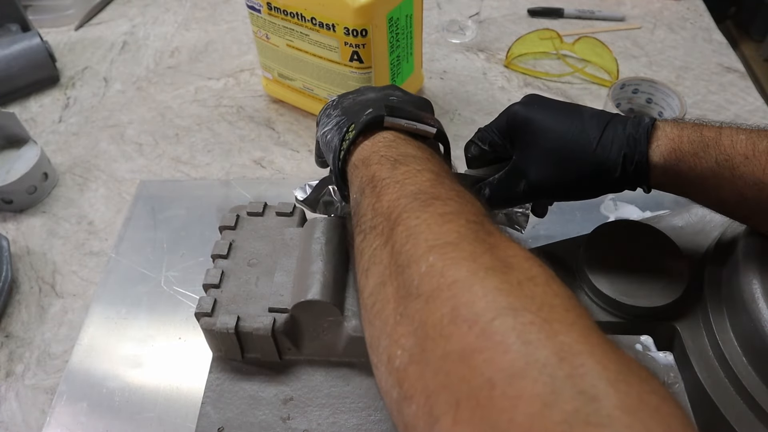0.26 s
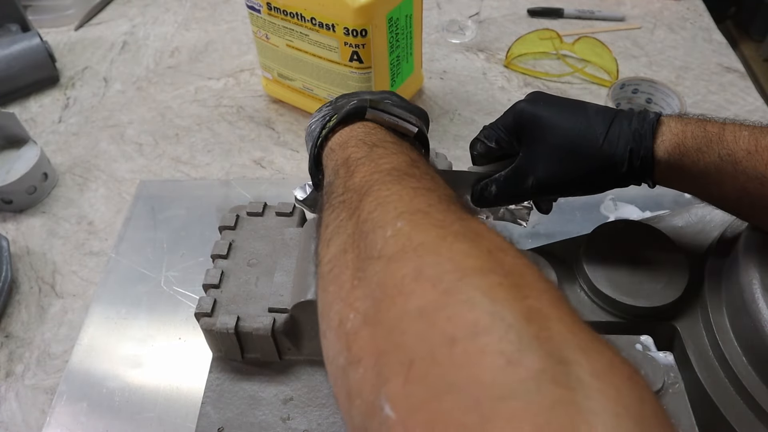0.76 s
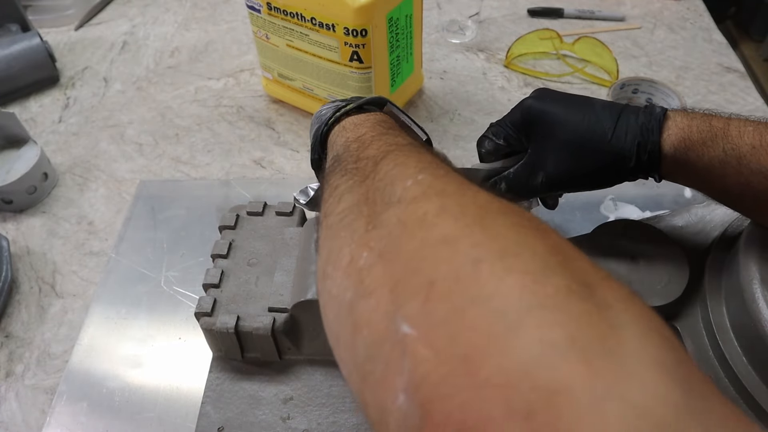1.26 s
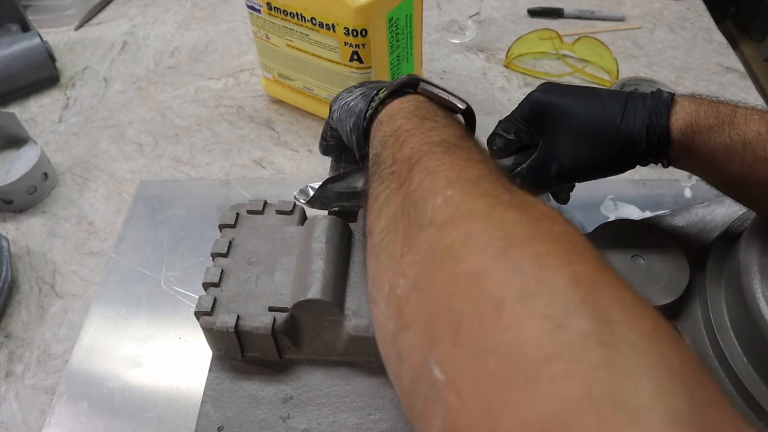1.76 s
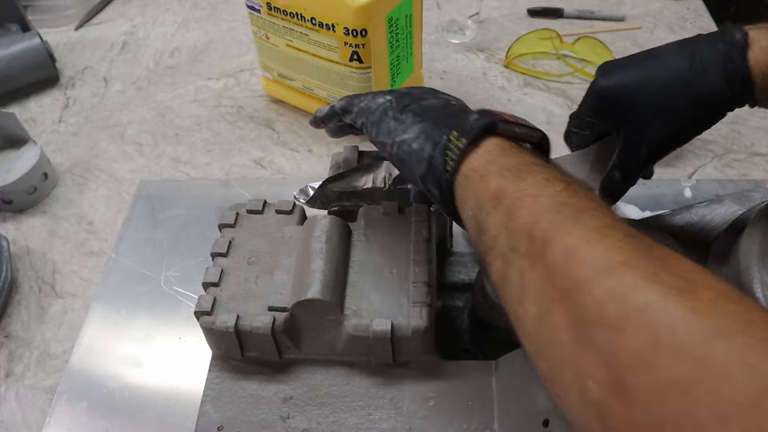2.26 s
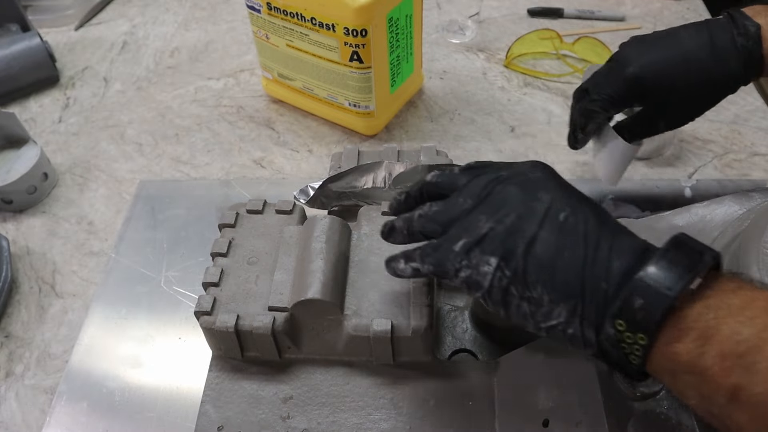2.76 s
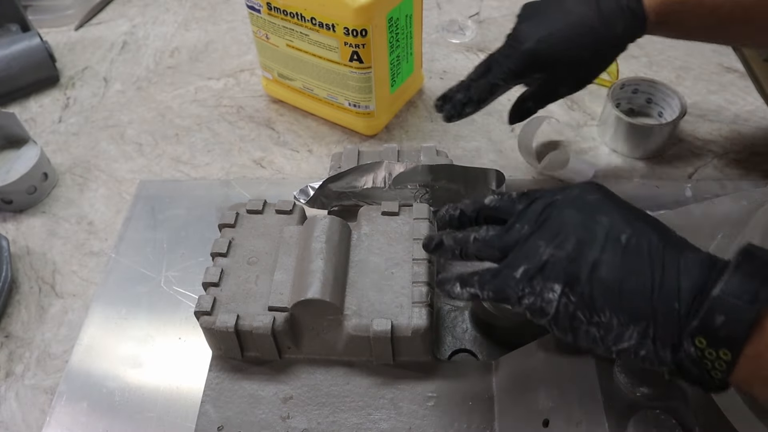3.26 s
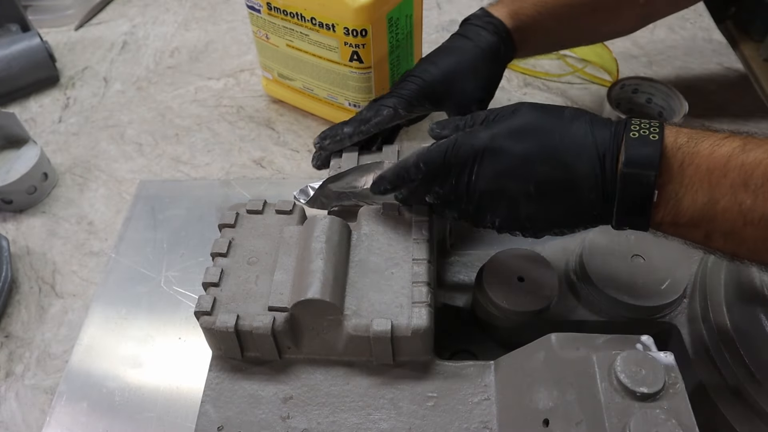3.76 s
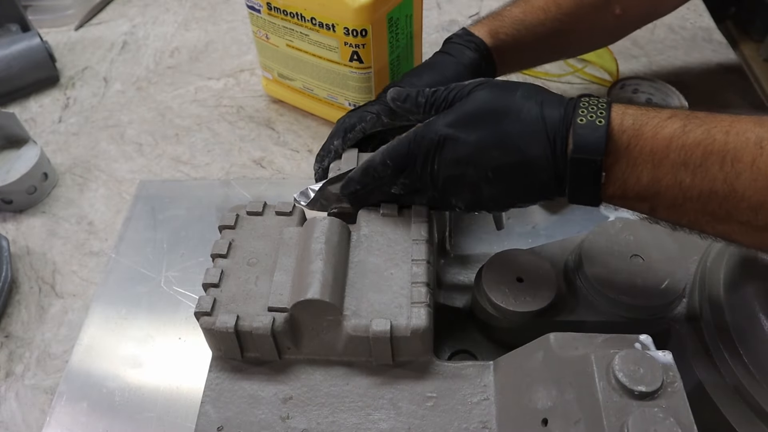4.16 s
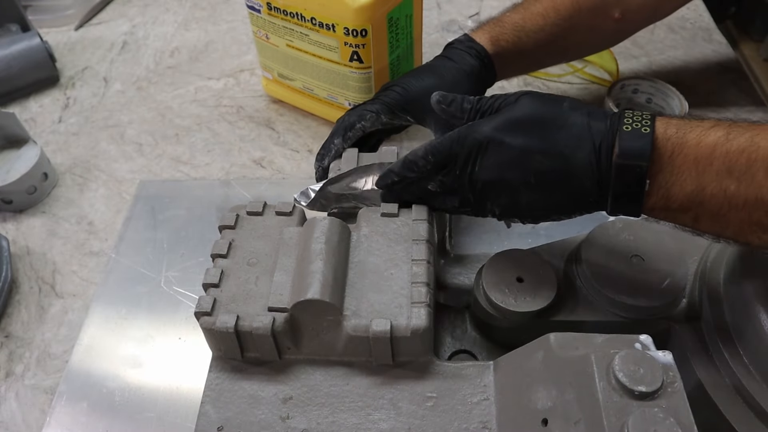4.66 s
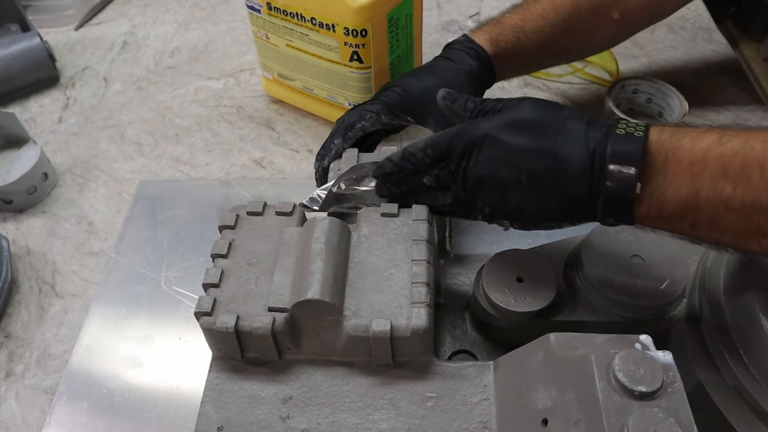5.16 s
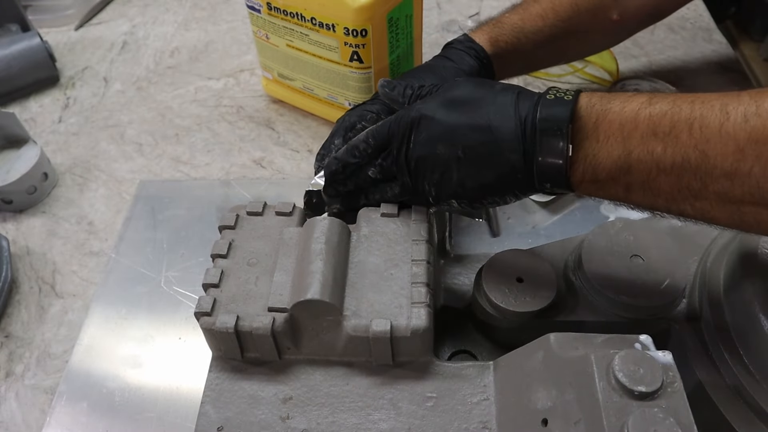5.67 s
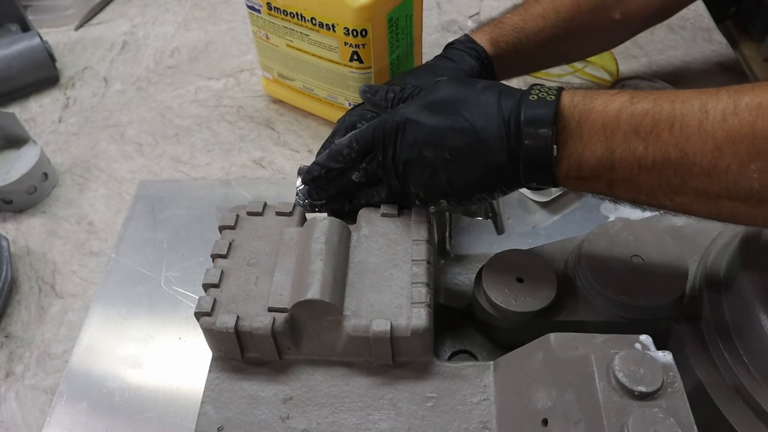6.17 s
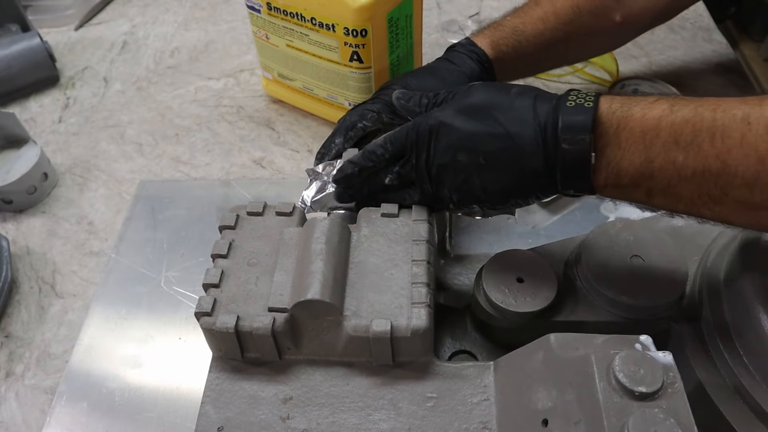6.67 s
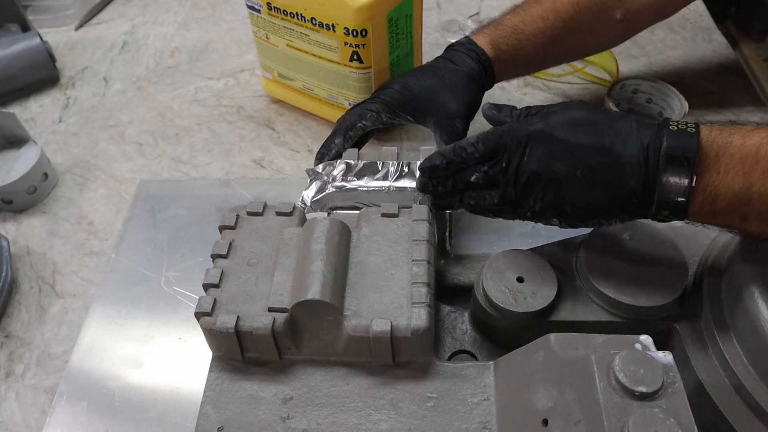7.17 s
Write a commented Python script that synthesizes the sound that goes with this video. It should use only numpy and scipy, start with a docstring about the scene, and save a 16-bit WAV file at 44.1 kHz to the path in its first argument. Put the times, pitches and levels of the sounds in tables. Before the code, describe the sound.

Close, irregular foil crackling and scraping under gloved hands, creases popping brightly while the casting beneath thuds softly on a workbench.

```python
"""Foil tape on a casting

Gloved fingers press foil tape over a hollow casting on a workbench, close to a mid-side microphone.
Strokes are streams of tiny random clicks that hiss, ring the foil and shake the casting.
Creases snap as bursts of ringing noise, loose flaps ping, and the casting groans and knocks as swelling tones.
Filtered noise makes the room hiss and the faint rumble underneath."""
import sys
import numpy as np
from scipy import signal
from scipy.fft import rfft, irfft, next_fast_len
from scipy.io import wavfile

SR = 44100
rng = np.random.default_rng(int(sys.argv[2]) if len(sys.argv) > 2 else 0)


def transcribe(u):
    """Save the signal u as a 16-bit wav file named by the first command-line argument.

    u: samples, shape (n,) or (channels, n), limited to [-1, 1]; the rate is SR.
    q: integer samples, one column per channel.
    """
    v = np.clip(np.atleast_2d(u).T, -1, 1)
    q = np.round(v * 32767).astype(np.int16)
    wavfile.write(sys.argv[1], SR, q)


def invert_db(level):
    """Linear amplitude ratio for a level in decibels (20 dB per decade), elementwise."""
    return 10 ** (np.asarray(level, dtype=float) / 20)


N = 326384  # length in samples

# Finger strokes. Each row: rough touch, hardest moment and lift in seconds (in short strokes these may
# cross slightly), then hiss, scrape and drag in dB at the hardest moment.
STROKES = [(0.0, 0.019, 0.064, -36, -35.5, -34), (0.058, 0.093, 0.14, -58.5, -55.5, -46),
           (0.172, .178, 0.19, -65, -54, -37), (0.195, 0.213, 0.27, -44, -41, -42),
           (0.237, 0.281, 0.36, -51, -47, -41), (0.388, 0.54, 0.68, -52.5, -53.5, -41.5),
           (0.707, 0.695, 0.77, -55.5, -50.5, -47.5), (0.825, 0.826, 0.86, -63.5, -60, -45.5),
           (0.876, 0.892, 0.89, -59.5, -60, -47), (0.953, 0.966, 1.45, -53.5, -53, -38.5),
           (1.304, 1.308, 1.305, -32, -41, -48), (1.348, 1.376, 1.426, -53.5, -44.5, -36),
           (1.489, 1.52, 1.622, -44, -37.5, -25.5), (1.555, 1.612, 1.7, -50, -42.5, -39),
           (1.688, 1.696, 1.78, -35.5, -43, -46), (1.79, 1.858, 1.926, -52, -57.5, -46),
           (1.928, 1.964, 2.04, -48, -54, -42.5), (2.067, 2.078, 2.176, -43.5, -45, -38.5),
           (2.188, 2.197, 2.24, -36, -30, -51), (2.247, 2.316, 2.484, -44, -52.5, -46),
           (2.427, 2.438, 2.684, -34, -34.5, -39.5), (2.463, 2.494, 2.55, -24.5, -23, -45),
           (2.56, 2.555, 2.85, -43.5, -46, -50), (2.657, 2.731, 2.753, -31, -39, -39.5),
           (2.73, 2.759, 2.827, -38.5, -40.5, -40.5), (2.842, 2.91, 2.9, -53, -63, -55),
           (2.957, 2.958, 3.06, -31.5, -37, -50), (3.008, 3.006, 3.08, -32, -29.5, -52),
           (3.067, 3.141, 3.16, -40.5, -52, -54), (3.12, 3.179, 3.184, -40, -48.5, -52.5),
           (3.296, 3.306, 3.34, -39, -45.5, -76), (3.308, 3.343, 3.407, -32, -33.5, -61.5),
           (3.512, 3.508, 3.536, -48.5, -58, -61), (3.606, 3.688, 3.72, -62.5, -87, -88),
           (3.819, 3.835, 3.985, -45.5, -54, -48.5), (3.914, 3.962, 3.94, -41.5, -49, -40),
           (4.057, 4.085, 4.18, -54, -57.5, -46), (4.202, 4.238, 4.28, -50, -56, -48),
           (4.253, 4.314, 4.37, -48.5, -52.5, -46), (4.475, 4.537, 4.574, -42.5, -47, -44.5),
           (4.601, 4.636, 4.625, -42, -47, -42), (4.827, 4.819, 4.84, -26, -41, -60),
           (4.855, 4.864, 4.9, -49, -51, -38), (4.961, 4.983, 5, -47, -36, -46.5),
           (5.01, 5.12, 5.17, -58.5, -58, -51.5), (5.22, 5.224, 5.31, -40, -55, -44),
           (5.273, 5.274, 5.345, -45, -40, -54), (5.313, 5.404, 5.47, -44.5, -43.5, -50),
           (5.522, 5.538, 5.58, -53.5, -60, -54.5), (5.672, 5.692, 5.68, -43, -41.5, -48.5),
           (5.714, 5.74, 5.81, -40, -36, -39.5), (5.847, 5.873, 6, -49, -39.5, -31.5),
           (5.87, 5.909, 6.0, -45, -39, -43), (5.993, 6.01, 6.01, -34.5, -44, -32),
           (6.132, 6.195, 6.21, -47, -50, -49.5), (6.282, 6.295, 6.4, -50.5, -56.5, -42),
           (6.382, 6.429, 6.43, -47.5, -42.5, -38.5), (6.516, 6.59, 6.66, -45, -48.5, -46.5),
           (6.602, 6.654, 6.77, -47.5, -48, -50), (6.785, 6.818, 7.02, -45, -51, -45),
           (6.84, 6.905, 7, -45.5, -48, -42.5), (6.981, 6.984, 7.02, -33, -44, -40),
           (7.006, 7.088, 7.185, -34, -50, -46), (7.186, 7.213, 7.28, -39, -48, -46),
           (7.336, 7.379, 7.44, -40, -50, -46.5)]
# The lightest touch: hiss, scrape and drag in dB.
LIGHT_TOUCH = [-63, -59.5, -51.5]
# Tone of the hiss. Each row: frequency in Hz, relative level in dB per Hz.
HISS_TONE = [(1470, -24), (2500, -7.5), (5150, -7.5), (5520, -8), (9220, -13), (12000, -10.5),
             (14500, -28.5), (16000, -34)]
# Tone of the scrape. Each row: frequency in Hz, relative level in dB per Hz.
SCRAPE_TONE = [(710, -10), (1200, -10.5), (1650, -7), (1990, -4.5), (2640, -8.5), (4800, -16.5),
               (6800, -27), (10600, -70)]
# Ringing modes of the foil sheet. Each row: pitch in Hz, relative level in dB, time to fade 60 dB in seconds
# (snaps use half that time).
FOIL_MODES = [(553, -2.5, 0.17), (670, 4, 0.045), (754.3, -1, 0.13), (873, -8.5, 0.07), (961, 11.5, 0.035),
              (1092, -7.5, 0.11), (1215, -6, 0.089)]
# Ringing modes of the casting. Each row: pitch in Hz, relative level in dB, time to fade 60 dB in seconds
# (knocks have a fade of their own).
CASTING_MODES = [(143.6, -8, 0.037), (195, -13.5, 0.055), (240, -6.5, 0.18), (285, 1.5, 0.092),
                 (332.8, -1.5, 0.14), (386, -11.5, 0.18)]
# Snapping creases. Each row: time in seconds, panel peak in dB, panel pitch in Hz, sheet in dB above the
# panel, crack in dB above the panel.
SNAPS = [(0.0233, -21, 1910, 4.5, -8), (0.173, -37, 1930, 0, -20), (0.2029, -25, 1960, -3, -11),
         (0.225, -24.5, 1910, 2.5, -16), (0.2713, -26, 2530, -3, -7), (0.3154, -35, 1970, 9, -17),
         (0.7035, -24.5, 2000, -4.5, -22), (0.9632, -41.5, 1410, 8.5, -6), (0.9825, -43, 1310, -19, 9),
         (1.1154, -34, 2400, 2, -16), (1.227, -33, 2360, -2.5, -7), (1.0131, -29.5, 1840, -23, -18),
         (1.0695, -33.5, 2220, 0, -22), (1.0994, -31.5, 2350, -3, -23), (1.1907, -34.5, 1650, 2, -4),
         (1.2663, -31.5, 2470, 4.5, -13), (1.291, -29.5, 1530, -3, -1), (1.3109, -20, 2400, -13, 1.5),
         (1.609, -29.5, 1520, -16, -1.5), (1.6452, -29.5, 2240, 4.5, -5), (1.698, -6, 2350, -18.5, -3),
         (1.745, -26.5, 2540, -7, -11), (2.0784, -37, 2360, -25, -9), (2.0944, -20, 2170, -13, -28),
         (2.1949, -17.5, 2340, -10, -4.5), (2.2524, -29.5, 1330, 14.5, -24),
         (2.4387, -13.5, 4060, -16.5, -10), (2.462, -29, 3000, -7, -13), (2.478, -18, 4000, -2, -11),
         (2.4885, -8, 1940, -38, -25), (2.5571, -16.5, 3580, -12, -29), (2.595, -23, 2120, -6, -23),
         (2.7005, -19, 2080, -9, -19), (2.7194, -23.5, 2260, -6, 6), (2.9558, -16, 2860, -41, -11),
         (3.0067, -13, 2640, -13, -22), (3.051, -12.5, 3000, -41, 0.5), (3.5094, -36, 3048, -20, -24),
         (3.9572, -35, 2870, 1, -10), (4.0748, -38.5, 2500, 2.5, -14), (4.7026, -41, 2030, -3.5, -28),
         (4.128, -34.5, 1240, -3, -7), (4.6159, -33, 3100, -7, -14), (4.8187, -20, 1740, -42, 9.5),
         (4.8654, -20, 2470, -34, 0.5), (4.9684, -32, 2039, -9, -22), (4.9786, -23, 4470, -17, -21),
         (5.1416, -33, 2070, 1, -20), (5.2244, -29.5, 3200, -11, 3), (5.2724, -16, 5200, -32, -29),
         (5.2824, -10.5, 1990, -23, -20), (5.3522, -22, 2080, -12, -30), (5.4138, -38, 1370, 1, -19),
         (5.6785, -30.5, 3533, -8, -21), (5.7309, -25, 3160, -12, -28), (5.7544, -28, 2280, 5, -16),
         (5.8638, -37, 2060, -14, -17), (5.9802, -25, 2060, -19, 2.5), (6.0097, -17, 4730, -31, -11),
         (6.2886, -34.5, 1470, 0, -18), (6.4248, -32.5, 1453, 1.5, -25), (6.916, -27.5, 2160, -25, -16),
         (6.9803, -9, 3170, -11.5, -6.5), (7.18, -31.5, 2210, -25, -12), (7.206, -29.5, 3075, -5, 0),
         (7.2786, -34.5, 2050, -12, -22), (7.348, -32, 2300, -9, -3)]
# Flicked flaps of foil, and the long ring of the panel that snaps at 5.28 s (the 1890 Hz row). Each row: time
# in seconds, level in dB before the fade, pitch in Hz.
PINGS = [(0.024, -25, 730), (.214, -27, 555), (4.968, -37.5, 654), (5.285, -5.5, 1890), (5.414, -30.5, 647),
         (5.751, -28, 730), (6.724, -31.5, 646), (6.852, -37, 646), (6.984, -24, 735), (7.261, -40.5, 610)]
# Groans of the pushed casting. Each row: rough start, loudest moment and end in seconds (the first two may
# cross slightly), first and last pitch in Hz, loudest level in dB before the wobble.
GROANS = [(1.498, 1.537, 1.59, 262.7, 245, -25.5), (1.53, 1.555, 1.568, 275, 278, -20),
          (1.551, 1.584, 1.594, 300.2, 307, -18.5), (1.593, 1.616, 1.635, 282, 284, -23.5),
          (1.639, 1.65, 1.69, 289.4, 292, -29.5), (2.249, 2.255, 2.274, 310, 317, -9.5),
          (5.774, 5.797, 5.822, 306, 265, -15), (5.857, 5.884, 5.925, 285, 254, -15),
          (5.894, 5.892, 5.93, 347.3, 447, -17), (6.284, 6.296, 6.34, 350.6, 340, -25.5)]
# Casting knocks on the bench. Each row: time in seconds, main tone peak in dB, pitch in Hz, upper partials
# in dB relative to the main tone.
KNOCKS = [(0.022, -26, 216, -10), (0.205, -27, 424, -9), (0.255, -26.5, 155, -5), (0.319, -24.5, 240, -8),
          (0.328, -25.5, 233, -13), (0.559, -39.5, 337, -22), (0.602, -34, 276, -23),
          (0.625, -37, 279, -20), (0.826, -39, 253, -20), (0.963, -34, 325, -14), (1.014, -28.5, 272, -22),
          (1.045, -26.5, 265, -20), (1.07, -27, 267, -30), (1.099, -30, 251, -16), (1.122, -32.5, 248, -16),
          (1.225, -34, 275, -14), (1.265, -33, 260, -8), (1.19, -25.5, 247, -21), (1.289, -29.5, 254, -10),
          (1.372, -31, 285, -16), (1.682, -22.5, 289, -17), (1.84, -37.5, 333, -20), (2.071, -43, 297, -16),
          (2.107, -19.5, 225, -31), (2.204, -26.5, 317, 0.5), (2.274, -24, 243, 0), (2.484, -23.5, 320, 0),
          (2.579, -26.5, 303, -11), (2.673, -35, 283, -26), (3.012, -39, 247, -10), (4.07, -41, 278, -23),
          (4.124, -17, 224, -22), (4.143, -28, 213, -13), (4.215, -40, 240, -21), (4.374, -35, 239, -8),
          (4.625, -38, 286, -9), (4.824, -38.5, 216, 1.5), (5.134, -39, 160, 5), (5.327, -31.5, 246, -30),
          (5.449, -30.5, 240, -10), (6.127, -39, 240, -27), (6.428, -30.5, 227, -6),
          (6.917, -35.5, 250, -1.5), (7.213, -35, 285, -3.5), (7.334, -42.5, 178, 0)]
# Tone of the room hiss. Each row: frequency in Hz, relative level in dB per Hz.
ROOM_TONE = [(59, -19), (100, 4), (1430, -14), (1920, -16), (2180, -16), (13100, -32), (14500, -26),
             (15500, -18)]
# Bench rumble before the scrape lifts it. Each row: time in seconds, level in dB.
RUMBLE = [(0.0, -47.5), (0.97, -58), (1.03, -43), (1.32, -43), (1.34, -56), (1.61, -41.5), (1.85, -52),
          (2.37, -45), (2.39, -56), (3.42, -51.5), (3.5, -62.5), (4.33, -50), (4.41, -61), (5.4, -51.5),
          (5.65, -61), (5.71, -45.5), (5.91, -55.5), (7.4, -54.5)]
# Tone of the side channel. Each row: frequency in Hz, gain in dB.
SIDE_GAIN = [(60, -11), (250, -6.5), (700, -4), (1500, -1.5), (3000, 1), (6000, 2), (14000, 3.5)]

# How a stroke grows and fades
APPROACH_SHARE, APPROACH_DB = 0.33, 16.5  # the glove brushes in first: share of the climb time, depth in dB
TOUCH_SHARE, LIFT_SHARE = 0.18, 0.35  # share of the climb from light to hardest, at touch and at lift
RISE_ROUND, EASE_ROUND = 1.3, 1.2  # 1 = pointed top, 2 = rounded
LIFT_DB_PER_S = 471  # how fast a stroke dies when the finger lifts
SHEET_FROM_DRAG, SHEET_DB = 0.39, -1.5  # the sheet follows scrape and drag together

# How things ring; cycles count until the ringing is 60 dB down
PANEL_CYCLES, PING_CYCLES = 17.6, 57
CRACKLE_T60_S = 0.079  # small cracks that trail each snap
GROAN_SWELL_DB, GROAN_FADE_DB = 17, 15  # below the loudest, at start and end
KNOCK_RISE_S, KNOCK_T60_S = 0.0049, 0.096
THUD_HZ, THUD_DB = 135.6, -8.5  # the bench top under each knock, relative to the main tone

# Background, space and microphone
ROOM_DB = -60
RUMBLE_FOLLOWS, RUMBLE_REST_DB = 0.13, -58  # share of the scrape's climb above rest
SHOP_T60_S, SHOP_DB = 0.066, -11
WALLS_T60_S = 0.12  # the side capsule faces the farther walls
SIDE_DIRECT_SHARE, SIDE_TURN_RAD = 0.12, 2.04  # power share of direct sound, and its turn in phase
BENCH_SIDE_DB = -17.5  # what comes through the bench is nearly centred
MIC_CUT_HZ = 14700


def rms_one(x):
    """Scale to rms 1."""
    return x / np.sqrt(np.mean(x ** 2) + 1e-20)


def colour(x, points):
    """Weight the spectrum by (Hz, dB) points, joined on a log frequency scale."""
    size = next_fast_len(x.shape[-1])
    hz, db = np.transpose(points)
    bins = np.fft.rfftfreq(size, 1 / SR)
    gain = invert_db(np.interp(np.log(bins + 1), np.log(hz + 1), db))
    return irfft(rfft(x, size) * gain, size)[..., :x.shape[-1]]


def lowpass_or_band(x, hz, kind="low"):
    """A Butterworth filter: keep the lows below hz, or the band between two frequencies."""
    return signal.sosfilt(signal.butter(2, hz, kind, fs=SR, output="sos"), x)


def ring(x, hz, t60):
    """A resonator: a unit click sets a fading sine of height 1 ringing."""
    r = invert_db(-60 / (max(t60, 0.002) * SR))  # shrink per sample
    w = 2 * np.pi * hz / SR
    return signal.lfilter([0, np.sin(w)], [1, -2 * r * np.cos(w), r * r], x + 1e-18)


def fade_60db(t, t60):
    """Exponential fade that is 60 dB down after t60 seconds."""
    return np.exp(-np.log(1000) * t / t60)


def sine(hz, t):
    """A steady sine of height 1."""
    return np.sin(2 * np.pi * hz * t)


def drift(rate):
    """Slow random wandering of rms 1, from noise smoothed at rate (Hz)."""
    r = np.exp(-2 * np.pi * rate / SR)
    noise = rng.standard_normal(N + SR)
    return rms_one(signal.lfilter([1], [1, -2 * r, r * r], noise)[SR:])  # skip the first second to settle


def slips(per_s, spread_db, clump_db, clump_rate):
    """Stick-slip clicks of uneven size, coming in clumps; rms 1."""
    sizes = invert_db(spread_db * np.minimum(rng.exponential(1, N), 5)) * rng.standard_normal(N)
    happens = rng.random(N) < per_s / SR
    return rms_one(sizes * happens * invert_db(clump_db * drift(clump_rate)))


def add(out, sound, s):
    """Mix a short sound in at time s (seconds)."""
    i = round(s * SR)
    out[..., i:i + sound.shape[-1]] += sound[..., :N - i]


def strokes():
    """Dense slips hiss, sparser ones ring panels and sheet, and the drag shakes the casting."""
    hiss_db, scrape_db, sheet_db, drag_db = pressure()
    fine = slips(14000, 2, clump_db=1.2, clump_rate=40)
    coarse = slips(5000, 2.4, clump_db=2.2, clump_rate=40)
    drag = slips(600, 2.2, clump_db=2.5, clump_rate=20)
    ticks = slips(400, 2, clump_db=3, clump_rate=8)

    hiss = flicker(fine + 0.35 * ticks, patchy_db=1.8, rate=18)
    hiss = rms_one(colour(hiss, HISS_TONE))
    rung = rms_one(facets(coarse + 0.3 * ticks, cycles=95, patchy_db=4.5))
    brightened = rms_one(np.gradient(rung))  # the slope favours high pitches
    scrape = rms_one(colour(brightened + 0.6 * fine + 0.35 * ticks, SCRAPE_TONE))

    sheet = rms_one(sum(invert_db(db) * ring(coarse + drag, hz, t60) for hz, db, t60 in FOIL_MODES))
    dull = rms_one(lowpass_or_band(coarse, [450, 1300], "band"))
    shake = rms_one(sum(invert_db(db) * ring(drag, hz, t60) for hz, db, t60 in CASTING_MODES))
    shake = lowpass_or_band(shake, 520)

    surface = invert_db(hiss_db) * hiss + invert_db(scrape_db) * scrape
    return surface + invert_db(sheet_db) * 0.71 * (sheet + dull) + invert_db(drag_db) * shake


def pressure():
    """Levels in dB: each stroke climbs from a light touch to its hardest, eases off and dies after the lift."""
    t = np.arange(N) / SR
    levels = np.full((3, N), -200.0)  # hiss, scrape and drag
    for touch, hardest, lift, *top in STROKES:
        brush = touch - APPROACH_SHARE * (hardest - touch)
        down = slice(max(int(brush * SR), 0), int(lift * SR))
        climb = np.maximum(top - np.array(LIGHT_TOUCH), 0)
        away = np.interp(t[down], [touch, hardest, lift], [-1, 0, 1])  # 0 at the hardest moment
        before = (1 - TOUCH_SHARE) * np.maximum(-away, 0) ** RISE_ROUND
        after = (1 - LIFT_SHARE) * np.maximum(away, 0) ** EASE_ROUND
        approach = np.interp(t[down], [brush, touch], [APPROACH_DB, 0])
        stroke = np.c_[top] - np.c_[climb] * (before + after) - approach
        levels[:, down] = np.maximum(levels[:, down], stroke)
    # no level may fall faster than the lift rate
    fall = LIFT_DB_PER_S * t
    hiss, scrape, drag = np.maximum.accumulate(levels + fall, axis=1) - fall
    sheet = SHEET_DB + scrape + SHEET_FROM_DRAG * (drag - scrape)
    return hiss, scrape, sheet, drag


def flicker(x, patchy_db, rate):
    """Bands of the treble swell and sink on their own as folds open and close."""
    edges = [1500, 3200, 4500, 6300, 9000, 16000]  # Hz
    out = np.zeros(N)
    for k, edge in enumerate(zip(edges, edges[1:])):
        sign = (-1) ** k  # signs alternate so that neighbours join
        out += sign * lowpass_or_band(x, edge, "band") * invert_db(patchy_db * drift(rate))
    return out


def facets(clicks, cycles, patchy_db):
    """Clicks are dealt to 32 small foil panels; each has its own pitch and comes and goes as folds shift."""
    pitches = np.geomspace(1150, 6500, 32) * invert_db(rng.normal(0, 0.1, 32))
    dealt = rng.integers(0, 32, N)
    patches = [drift(3.9) for _ in range(6)]  # panels share six slow drifts
    out = np.zeros(N)
    for k, hz in enumerate(pitches):
        own_clicks = clicks * (dealt == k) * invert_db(patchy_db * patches[k % 6])
        out += ring(own_clicks, hz, cycles / hz)
    return out


def snaps():
    """A crease flips: its panel rings at its own pitch, the sheet answers below, a bright crack sits on top."""
    out, t = np.zeros(N), np.arange(SR // 6) / SR
    noise = rng.standard_normal((len(SNAPS), 2, len(t)))
    strengths = invert_db(rng.normal(0, 5, (len(SNAPS), len(FOIL_MODES))))
    fade = 0.22 * fade_60db(t, CRACKLE_T60_S) + np.exp(-t / 0.00092)
    for (s, db, hz, sheet_db, crack_db), (dull, sharp), hit in zip(SNAPS, noise, strengths):
        dull[0] = sharp[0] = 0.76  # the flip itself
        dull, sharp = dull * fade, sharp * fade
        panel = ring(dull, hz, PANEL_CYCLES / hz) + 0.11 * ring(dull, hz * 1.19, PANEL_CYCLES / hz)
        panel = panel + invert_db(-4) * ring(sharp, hz * 1.6, 5 / hz)
        sheet = sum(k * invert_db(level_db) * ring(dull, mode_hz, 0.5 * t60)
                    for k, (mode_hz, level_db, t60) in zip(hit, FOIL_MODES))
        crack = lowpass_or_band(sharp, [4500, 11500], "band")
        for part, part_db in [(panel, 0), (sheet, sheet_db), (crack, crack_db)]:
            add(out, invert_db(db + part_db) * part / np.abs(part).max(), s - 0.0005)
    return out


def pings():
    """A flap of foil is flicked, or a snapped panel rings on, softly at one pitch."""
    out, t = np.zeros(N), np.arange(SR // 6) / SR
    for s, db, hz in PINGS:
        fading = invert_db(db - 60 * t * hz / PING_CYCLES)
        soft_start = 1 - np.exp(-t / 0.0012)
        add(out, fading * soft_start * sine(hz, t), s)
    return out


def groans():
    """The pushed casting sings a near-pure note that swells, slides and fades, with two weak partials above."""
    out, t = np.zeros(N), np.arange(N) / SR
    wobble = invert_db(2.5 * drift(70))
    for start, loudest, end, first_hz, last_hz, db in GROANS:
        edge = np.clip(np.minimum(t - start, end - t) / 0.005, 0, 1)  # 5 ms ramps
        level = np.interp(t, [start, loudest, end], [db - GROAN_SWELL_DB, db, db - GROAN_FADE_DB])
        phase = 2 * np.pi * np.cumsum(np.interp(t, [start, end], [first_hz, last_hz])) / SR
        note = np.sin(phase) + invert_db(-24.5) * np.sin(1.8 * phase) + invert_db(-24) * np.sin(3.1 * phase)
        out += edge * invert_db(level) * np.sqrt(2) * note  # root 2 turns rms into sine height
    return out * wobble


def knocks():
    """The hollow swells at a pitch set by how the casting is held; its other modes beat against it."""
    out, t = np.zeros(N), np.arange(SR // 4) / SR
    chance = rng.standard_normal((len(KNOCKS), len(CASTING_MODES)))
    rise = np.minimum(t / KNOCK_RISE_S, 1) ** 2
    swell = rise * fade_60db(np.maximum(t - KNOCK_RISE_S, 0), KNOCK_T60_S)
    thud = invert_db(THUD_DB) * sine(THUD_HZ, t)
    for (s, db, hz, upper_db), strengths in zip(KNOCKS, chance):
        others = sum(k * invert_db(level_db) * sine(mode_hz, t)
                     for k, (mode_hz, level_db, _) in zip(strengths, CASTING_MODES))
        upper = invert_db(upper_db) * (sine(hz * 1.756, t) + sine(hz * 2.61, t)) * np.exp(-t / 0.015)
        add(out, invert_db(db) * swell * (sine(hz, t) + invert_db(-5.5) * others + upper + thud), s - 0.002)
    return out


def echoes(x, t60):
    """Close reflections off bench and walls: a tail of noise that dies away, of unit energy."""
    t = np.arange(SR // 4) / SR
    tail = rng.standard_normal(len(t)) * fade_60db(t, t60) * (t > 0.002)
    return signal.fftconvolve(x, tail / np.sqrt(np.sum(tail ** 2)))[:N]


def background():
    """Steady room hiss, and a lumpy low rumble through the bench that rises with the scraping."""
    hiss = invert_db(ROOM_DB) * rms_one(colour(rng.standard_normal(N), ROOM_TONE))
    low = rms_one(lowpass_or_band(rng.standard_normal(N), [22, 95], "band"))
    scrape_db = pressure()[1]
    pushed = RUMBLE_FOLLOWS * np.maximum(scrape_db - RUMBLE_REST_DB, 0)
    rumble_db = np.interp(np.arange(N) / SR, *np.transpose(RUMBLE)) + pushed
    return hiss, invert_db(rumble_db) * low


def scene():
    """The mid capsule hears pressure; the side capsule hears it turned in phase, and its own echoes."""
    hiss, rumble = background()
    foil = snaps() + pings() + strokes() + hiss
    bench = knocks() + groans() + rumble
    near = foil + bench
    wide = foil + invert_db(BENCH_SIDE_DB) * bench

    turned = signal.hilbert(wide, next_fast_len(N)) * np.exp(-1j * SIDE_TURN_RAD)
    direct = np.sqrt(SIDE_DIRECT_SHARE) * np.real(turned)[:N]
    reflected = np.sqrt(1 - SIDE_DIRECT_SHARE) * echoes(wide, WALLS_T60_S)
    side = colour(direct + reflected, SIDE_GAIN)
    mid = near + invert_db(SHOP_DB) * echoes(near, SHOP_T60_S)
    return mid + side * [[1], [-1]]  # left = mid + side, right = mid - side


def top_cut(x):
    """Nothing passes above the cut-off."""
    return signal.sosfilt(signal.butter(12, 16310, fs=SR, output="sos"), x)


def record(dry):
    """The microphone rolls off steeply at the top."""
    mix = signal.sosfilt(signal.butter(10, MIC_CUT_HZ, fs=SR, output="sos"), dry)
    return top_cut(mix)


dry = scene()
out = record(dry)
transcribe(out)
```